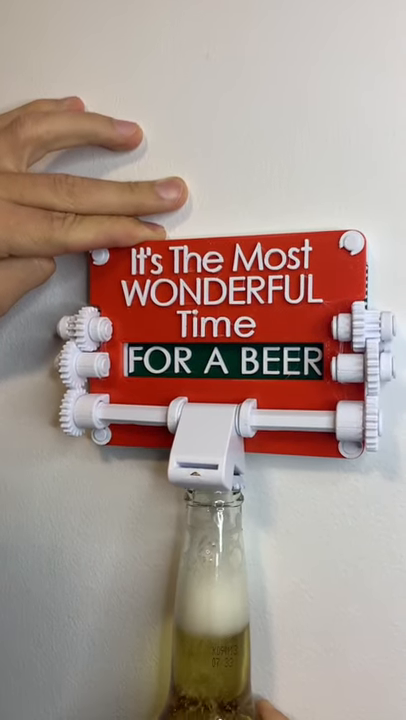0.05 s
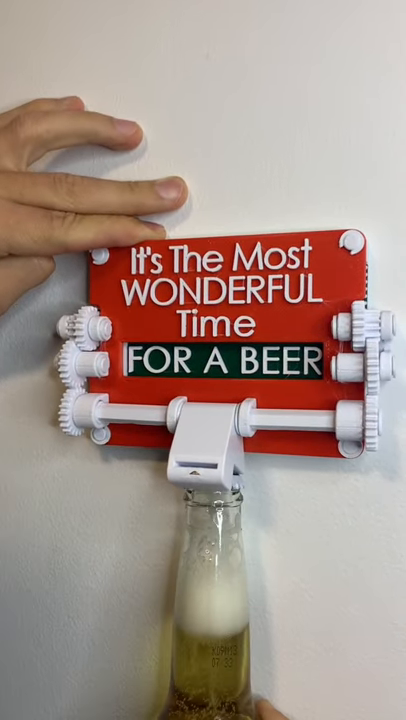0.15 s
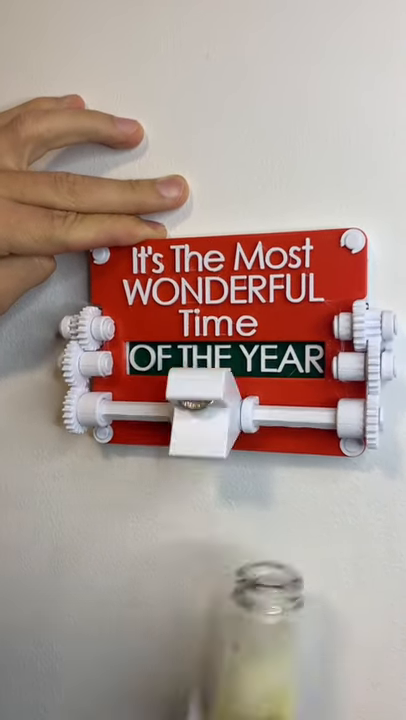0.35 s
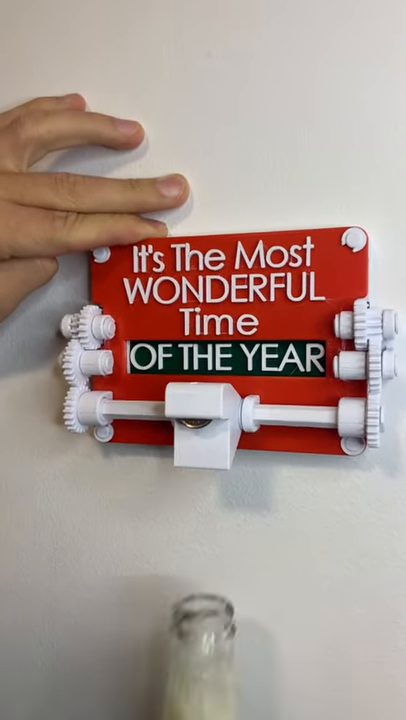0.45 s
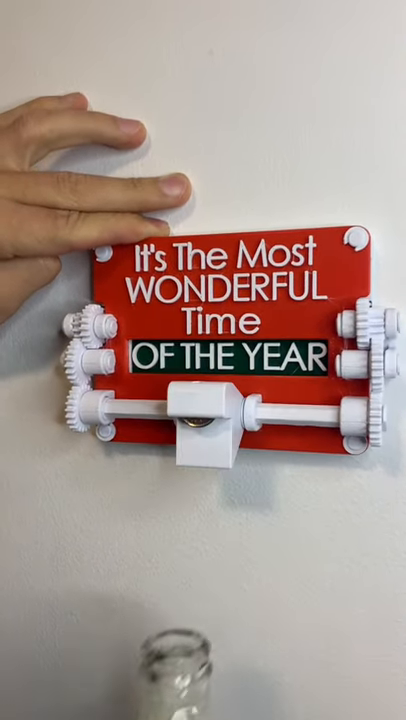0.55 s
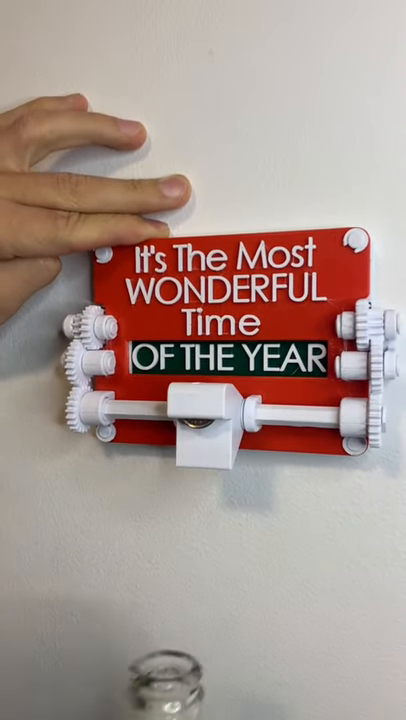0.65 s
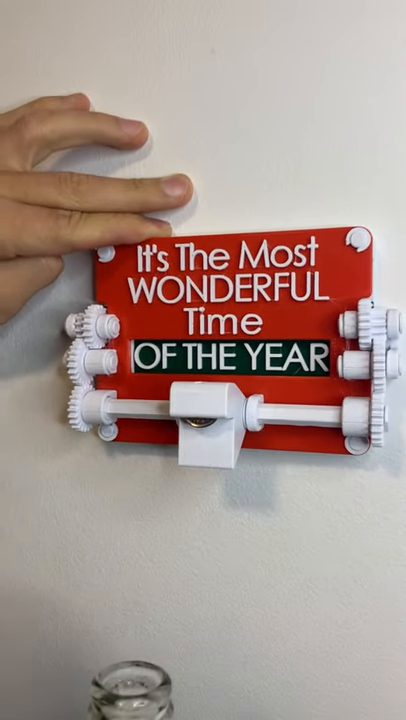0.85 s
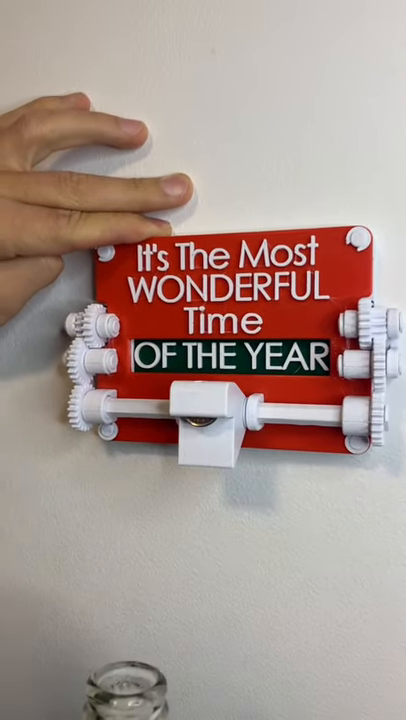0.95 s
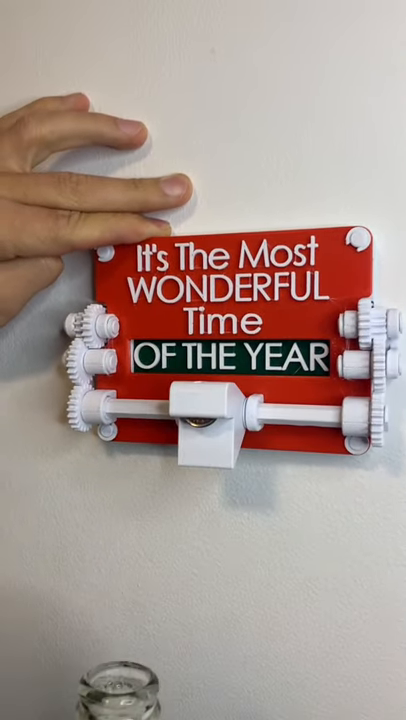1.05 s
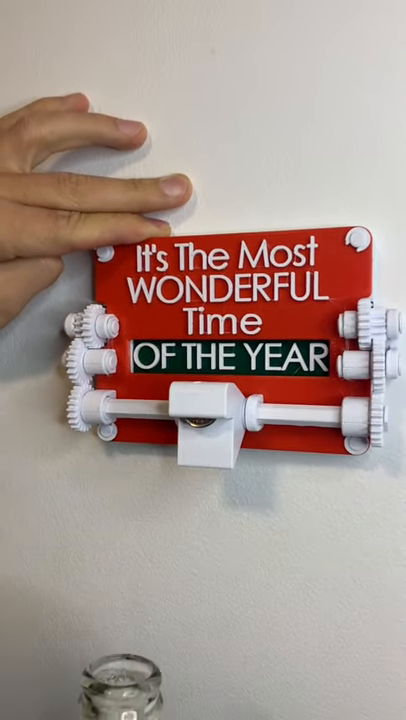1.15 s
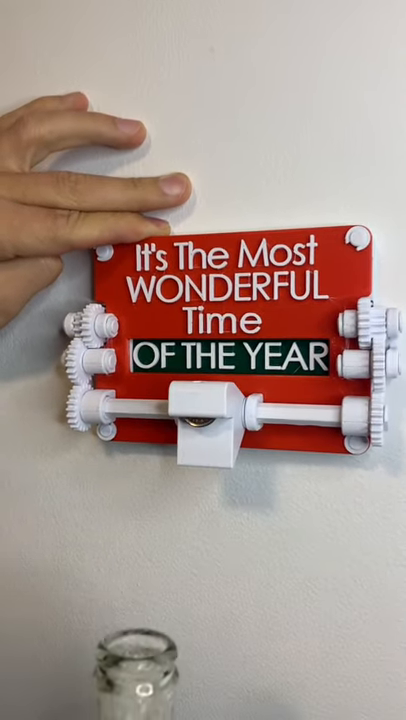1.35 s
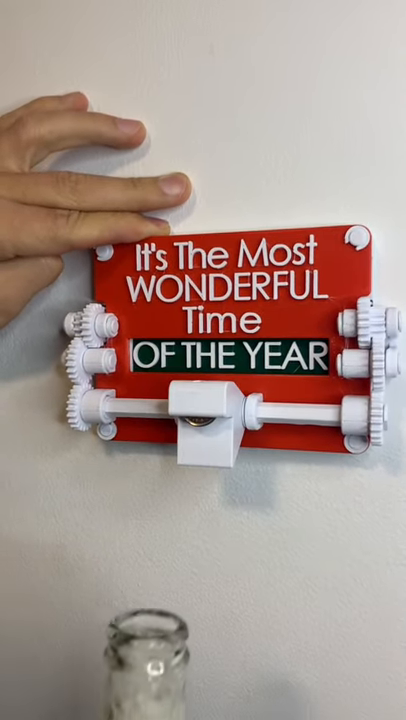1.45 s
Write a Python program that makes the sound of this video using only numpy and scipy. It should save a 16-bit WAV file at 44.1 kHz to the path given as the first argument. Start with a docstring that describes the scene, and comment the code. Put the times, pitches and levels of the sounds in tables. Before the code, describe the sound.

A crown cap pops sharply off a glass bottle, then lands with two tiny metallic clinks.

```python
"""Indoors, stereo, over faint ventilation rumble: a crown cap is levered off a glass bottle close to the microphones.
A soft, dull noise rises quickly, then gas bursts through the resonant neck while the crimps snap; a geared plastic
wall opener knocks, thumps and clacks. The limiter ducks the pop; its room echo stays nearly level during recovery.
Farther off, the cap lands twice on a hard floor: noise clicks and thuds, beating steel modes and a faint low hum."""
import sys
import numpy as np
from scipy import signal
from scipy.fft import rfft, irfft
from scipy.io import wavfile
from scipy.ndimage import uniform_filter1d, minimum_filter1d

SR = 44100
rng = np.random.default_rng(int(sys.argv[2]) if len(sys.argv) > 2 else 0)


def waveform_to_disk(signal):
    """Save audio, clipped to [-1, 1], as 16-bit WAV at the path in sys.argv[1]."""
    frames = np.transpose(np.atleast_2d(signal))
    scaled = np.clip(frames, -1, 1) * 32767
    samples = np.round(scaled).astype(np.int16)
    wavfile.write(sys.argv[1], SR, samples)


N = 66150

# Ventilation rumble: relative spectrum [f/Hz, level/dB per Hz]
RUMBLE_SPECTRUM = [(20, -6.5), (40, -11), (62, 2.5), (95, -12), (155, 0), (200, -6), (270, -6), (350, -19),
                   (550, -16), (850, -29), (2000, -40), (5000, -48.5), (9500, -43.5), (12500, -58.5),
                   (16000, -58.5)]
# Left-right likeness of the rumble [f/Hz, likeness -1..1]
RUMBLE_LIKENESS = [(30, 0.43), (70, 1), (150, 1), (300, 0.68), (700, 0), (2000, 0), (12000, 0.061)]
# Reverberation time of the room [f/Hz, t60/s]
ROOM_T60 = [(60, 0.47), (200, 0.58), (500, 0.5472), (1300, 0.5464), (3500, 0.5203), (7000, 0.3773),
            (11000, 0.29), (12300, 0.11), (16000, 0.36)]
# Left-right likeness of the reflections, clipped to -1..1 when used [f/Hz, likeness]
ROOM_LIKENESS = [(60, 0.981), (290, 1), (640, 0.72), (1400, 0.027), (3100, -1.1), (7000, 0.3), (10800, 0),
                 (12000, 0.38), (15000, -0.8)]
# Colour of the reflections [f/Hz, relative level/dB]
ROOM_TONE = [(100, -5.5), (300, 0), (700, -3), (1500, 0.5), (5000, 1), (11000, 1), (12300, -9.5),
             (14000, -12.5), (16000, -14)]
# Standing waves of the room, lowest first [f/Hz, level/dB, t60/s]
STANDING_WAVES = [(62.9, -21.5, 0.52), (151, -31.5, 0.72), (283.4, -37, 0.87), (345.8, -38.5, 0.93),
                  (485, -32.5, 0.7), (1260, -38.5, 0.74)]
# Cap landings [t/s, click level/dB, thud level/dB, ring level/dB, edge-on share 0..1, ring roughness 0..1]
LANDINGS = [(1.0553, -30, -22.5, -26.5, 0, 0.38), (1.183, -20.5, -33, -25, 0.96, 0.2)]
# Ringing modes of the cap [f/Hz, level landing flat/dB, level landing on edge/dB, t60/s]
CAP_MODES = [(1935, -15, -32, 0.13), (3920, -23, -2, 0.089), (3970, -7, -11.5, 0.264),
             (4048, -11.5, -20.5, 0.376), (5749, -35, -16, 0.28), (6120, -28.5, -4.5, 0.206),
             (6316, -27.5, -11, 0.191), (8620, -5.5, -13, 0.2), (8717, -14, 1, 0.145),
             (8775, -5.5, -12, 0.184), (11154, 0, -14.5, 0.137), (11056, -0.5, -37, 0.123)]
# Steel click on the floor: relative spectrum [f/Hz, level/dB per Hz]
CLICK_SPECTRUM = [(300, 0), (2000, -11.5), (3300, -1.5), (4500, 4), (6200, 8.5), (7200, -6.5), (8500, 9.5),
                  (9400, -1), (10400, 6.5), (11400, -4.5), (12500, -1.5), (13800, 8), (16000, -13)]
# Thud of the floor: relative spectrum [f/Hz, level/dB per Hz]
THUD_SPECTRUM = [(60, -34.5), (120, -4), (190, 2), (300, -1.5), (500, -6.5), (800, 1), (1400, -2),
                 (2500, -1), (3400, -10), (4500, -19), (9000, -14.5)]
# Left-right likeness of the landings, clipped to -1..1 when used [f/Hz, likeness]
FLOOR_LIKENESS = [(200, 0.963), (600, 0.74), (1500, -0.55), (3500, 0.443), (8000, 0.176), (11000, 0.36),
                  (12200, -1.83), (15000, 0.89)]
# Left-right likeness of the close sounds [f/Hz, likeness -1..1]
NEAR_LIKENESS = [(100, 1), (600, .88), (1500, 0.42), (3300, 0.74), (7000, 0), (10800, -0.19), (12200, -.95),
                 (15000, -.2)]
# Gear clacks in the opener [t/s, level/dB, decay/s]
GEAR_CLACKS = [(0.281, 2.5, 0.0028), (0.2859, -6, 0.0033), (0.291, -17.5, 0.0013), (0.3078, -15.5, 0.0031),
               (0.3144, -14, 0.0044)]
# Plastic of the gears: relative spectrum [f/Hz, level/dB per Hz]
PLASTIC_SPECTRUM = [(100, -16.5), (600, -14.5), (1400, -2.5), (3000, -9), (5000, -10.5), (7800, -6),
                    (10500, -10.5), (16000, -26.5)]
# Crimps slipping over the lip [t/s, level relative to SNAP_DB/dB]
CRIMP_SNAPS = [(0.2453, -12), (0.2475, 4), (0.2522, -2.5), (0.2528, 9.5)]
# Snapping crimps: relative spectrum [f/Hz, level/dB per Hz]
SNAP_SPECTRUM = [(200, -22.5), (1300, -1.5), (3500, 8), (7000, 1), (11000, -5.5), (16000, -4)]
# Soft, dull noise rising before the pop: relative spectrum [f/Hz, level/dB per Hz]
RISE_SPECTRUM = [(100, -15), (600, -17), (1400, 0), (2200, -11.5), (3100, -5.5), (5000, -11), (7500, -10),
                 (10000, -38)]
# Gas burst: relative spectrum [f/Hz, level/dB per Hz]
GAS_SPECTRUM = [(60, -16.5), (170, -9), (280, -5.5), (460, -4), (800, -4.5), (1500, -3), (2200, -8.5),
                (3500, -10.5), (5400, -10.5), (7500, -6), (11000, -9.5), (12700, -15), (13800, -20.5),
                (15500, -19)]
# Resonances of neck and opener [f/Hz, width/Hz, boost/dB]
NECK_RESONANCES = [(789, 64, 4), (954, 91, 4), (1230, 65, 8), (1337.3, 50, 7), (1526, 55, 4.5),
                   (1737, 45, 5.5), (1959, 60, 3.5), (2750, 440, 5), (4647, 130, 3), (6862, 200, 4.5),
                   (7960, 140, 4)]

RUMBLE_DB = -57
POP_ROOM_DB, FLOOR_ROOM_DB, RING_ROOM_DB = -15, -4, -5.5  # sends to the room
HUM_DB, HUM_T60_S = -50, 0.45  # a faint 63 Hz hum at the time of each landing
RING_SPREAD = 0.555  # range of the random phase in each channel, in cycles
CLICK_DECAY_S, THUD_DECAY_S, FLOOR_DIRECT_DB = 0.00228, 0.003055, -2
SECOND_TAP_S, SECOND_TAP_DB, TAP_RISE_S = 0.0064, -2, 0.00265  # the other side of the rim slaps down
THUMP_S, THUMP_DB, THUMP_HZ, THUMP_DECAY_S = .2546, -6, 66, 0.011
KNOCK_DB, KNOCK_WIDTH_S, CLACK_RISE_S = 3, 0.00045, 0.00093
RISE_DB, RISE_TIME_S, RISE_CURVE = -19, .0155, 1.6
POP_S, POP_DB, POP_HOLD_S, POP_RELEASE_S = .2448, 6.5, 0.01067, 0.00096
SNAP_DB, SNAP_DECAY_S = 4, 0.00016
POP_LAG_S = .00009  # close sounds reach the right microphone first
LIMIT_DB, LIMIT_HOLD_S, RECOVER_DB_PER_S = -10, 0.1084, 92
CEILING_DB, CUTOFF_HZ = -2.5, 15900


def amp(db):
    """Decibels to gain."""
    return 10 ** (np.asarray(db) / 20)


def read(points, hz):
    """A table read on a log-frequency axis."""
    f, value = np.transpose(points)
    return np.interp(np.log(hz + 1), np.log(f + 1), value)


def since(start):
    """Seconds since start, for every sample."""
    return np.arange(N) / SR - start


def decay(start, decay_s):
    """Sudden attack, exponential release."""
    t = since(start)
    return (t >= 0) * np.exp(-np.maximum(t, 0) / decay_s)


def tap(start, rise_s, decay_s):
    """Quick swell to a peak at start, then an exponential release."""
    t = since(start)
    return np.exp(np.minimum(t / rise_s, -t / decay_s))


def noise(likeness, lag_s=0):
    """Two channels of white noise with the given likeness; the left one may lag."""
    a, b = rfft(rng.standard_normal((2, N)))
    hz = np.fft.rfftfreq(N, 1 / SR)
    alike = np.clip(read(likeness, hz), -1, 1)
    mid = a * np.sqrt((1 + alike) / 2)
    side = b * np.sqrt((1 - alike) / 2)
    left = (mid + side) * np.exp(-2j * np.pi * hz * lag_s)
    return irfft(np.array([left, mid - side]), N)


def colour(x, spectrum, peaks=(), size=8192):
    """Causal filter of unit energy: a broad spectrum with resonances on top."""
    hz = abs(np.fft.fftfreq(size, 1 / SR))
    db = read(spectrum, hz)
    for f, width, boost in peaks:
        db = db + boost / (1 + (2 * (hz - f) / width) ** 2)
    # minimum phase, so that nothing sounds ahead of the source
    response = np.exp(np.conj(signal.hilbert(np.log(amp(db)))))
    taps = np.fft.ifft(response).real[:size // 2]
    return signal.fftconvolve(x, taps[None] / np.linalg.norm(taps), axes=1)[:, :N]


def rumble():
    """Ventilation: steady stereo noise, weighted to the bass."""
    return amp(RUMBLE_DB) * colour(noise(RUMBLE_LIKENESS), RUMBLE_SPECTRUM)


def reflect(x, early_db, early_t60):
    """Quick reflections from nearby surfaces, and a tail that dies at its own rate in each band."""
    hz, t, bands = signal.stft(noise(ROOM_LIKENESS), SR, nperseg=256)
    fade = np.exp(-np.log(1000) * t / read(ROOM_T60, hz)[:, None])
    tail = signal.istft(bands * fade, SR)[1][:, :N]
    early = noise(ROOM_LIKENESS) * decay(0, early_t60 / np.log(1000))
    response = tail / np.linalg.norm(tail[0]) + amp(early_db) * early / np.linalg.norm(early[0])
    response *= 1 - decay(0, 0.0011)  # the reflections build up over the first milliseconds
    return signal.fftconvolve(x, colour(response, ROOM_TONE), axes=1)[:, :N]


def room(source, early_db, early_t60, count=4):
    """A source sounds a little different in each direction, and each direction has its own reflections."""
    return sum(reflect(source(), early_db, early_t60) for _ in range(count)) / np.sqrt(count)


def ring(start, hz, db, t60):
    """One dying mode."""
    t = np.maximum(since(start), 0)
    return amp(db) * np.exp(-np.log(1000) * t / t60) * np.sin(2 * np.pi * hz * t)


def standing_waves():
    """Room modes ring on as decaying sines from the moment of the opener's thump."""
    return sum(ring(THUMP_S, *mode) for mode in STANDING_WAVES)


def low_hum():
    """A faint 63 Hz hum, a decaying sine, comes in at the time of each landing."""
    hum_hz = STANDING_WAVES[0][0]
    return sum(ring(s, hum_hz, HUM_DB, HUM_T60_S) for s, *_ in LANDINGS)


def cap_ring():
    """Each landing strikes the cap's close, beating modes anew; tumbling makes them waver and roughen."""
    out = np.zeros((2, N))
    for s, _, _, ring_db, edge, rough in LANDINGS:
        t = np.maximum(since(s), 0)
        edge, rough = np.clip(edge, 0, 1), np.clip(rough, 0, 1)
        for hz, flat_db, edge_db, t60 in CAP_MODES:
            mode_db = ring_db + flat_db + edge * (edge_db - flat_db)
            level = amp(mode_db) * decay(s, t60 / np.log(1000))
            # a steady part plus slow random changes of level and phase
            a, b = uniform_filter1d(rng.standard_normal((2, N)), size=260)
            tumble = np.sqrt(1 - rough) + np.sqrt(rough / 2) * (a + 1j * b) / a.std()
            channel_phase = np.exp(2j * np.pi * RING_SPREAD * rng.random((2, 1)))
            out += (channel_phase * (level * tumble * np.exp(2j * np.pi * hz * t))).imag
    return out


def landings():
    """Each landing of the cap is a double steel click with a double thud of the floor, both shaped noise."""
    click, thud = np.zeros((2, N))
    for s, click_db, thud_db, *_ in LANDINGS:
        for at, db in [(s, 0), (s + SECOND_TAP_S, SECOND_TAP_DB)]:
            click += amp(click_db + db) * tap(at, TAP_RISE_S, CLICK_DECAY_S)
            thud += amp(thud_db + db) * tap(at, TAP_RISE_S, THUD_DECAY_S)
    steel = colour(click * noise(FLOOR_LIKENESS), CLICK_SPECTRUM)
    floor = colour(thud * noise(FLOOR_LIKENESS), THUD_SPECTRUM)
    return steel + floor


def opener():
    """The freed lever knocks the plate against the wall with a low thump; the plastic gears clack."""
    t = since(THUMP_S)
    knock = amp(KNOCK_DB) * np.exp(-.5 * (t / KNOCK_WIDTH_S) ** 2)
    thump = amp(THUMP_DB) * decay(THUMP_S, THUMP_DECAY_S) * np.sin(2 * np.pi * THUMP_HZ * t)
    clacks = sum(amp(db) * tap(s, CLACK_RISE_S, decay_s) for s, db, decay_s in GEAR_CLACKS)
    gears = colour(clacks * noise(NEAR_LIKENESS, POP_LAG_S), PLASTIC_SPECTRUM)
    return knock + thump + gears


def pop():
    """A soft, dull noise rises quickly; then gas bursts through the neck and the crimps snap over the lip."""
    t = since(POP_S)
    rise = amp(RISE_DB) * np.clip(1 + t / RISE_TIME_S, 0, 1) ** RISE_CURVE * (t < 0)
    burst = amp(POP_DB) * (t >= 0) * np.exp(-np.maximum(t - POP_HOLD_S, 0) / POP_RELEASE_S)
    snaps = amp(SNAP_DB) * sum(amp(db) * decay(s, SNAP_DECAY_S) for s, db in CRIMP_SNAPS)
    parts = [(rise, RISE_SPECTRUM), (burst, GAS_SPECTRUM), (snaps, SNAP_SPECTRUM)]
    return sum(colour(level * noise(NEAR_LIKENESS, POP_LAG_S), spectrum, NECK_RESONANCES)
               for level, spectrum in parts)


def bottle():
    """Everything that sounds at the opener."""
    return pop() + opener()


def scene():
    """Near pop and distant cap in one room, over a faint rumble."""
    steel = cap_ring()
    echo = amp(POP_ROOM_DB) * room(bottle, early_db=-4.0, early_t60=0.27)
    echo += amp(FLOOR_ROOM_DB) * room(landings, early_db=4.0, early_t60=0.2705)
    echo += amp(RING_ROOM_DB) * reflect(steel, early_db=3, early_t60=0.0895)
    floor = amp(FLOOR_DIRECT_DB) * landings()
    return rumble() + standing_waves() + low_hum() + echo + steel + floor + bottle()


def record(dry):
    """A look-ahead limiter ducks the pop, holds and recovers; peaks are rounded off; then the band limit."""
    power = uniform_filter1d((dry ** 2).mean(0), size=130)
    over_db = np.maximum(10 * np.log10(abs(power) + 1e-12) - LIMIT_DB, 0)
    half = int(LIMIT_HOLD_S * SR / 2)
    held_db = -minimum_filter1d(-over_db, 2 * half + 1, origin=half)
    # after the hold, the ducking may fall no faster than the recovery rate
    fall_db = since(0) * RECOVER_DB_PER_S
    duck_db = np.maximum.accumulate(held_db + fall_db) - fall_db
    duck_db = uniform_filter1d(duck_db, size=50)
    rounded = amp(CEILING_DB) * np.tanh(dry * amp(-duck_db - CEILING_DB))
    lowpass = signal.firwin(511, CUTOFF_HZ, window=("kaiser", 9), fs=SR)
    return signal.oaconvolve(rounded, lowpass[None], "same")


dry = scene()
out = record(dry)
waveform_to_disk(out)
```